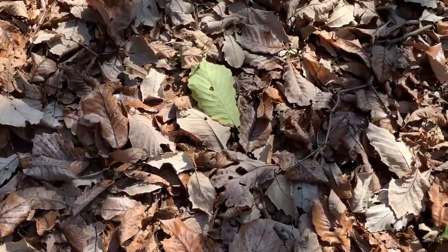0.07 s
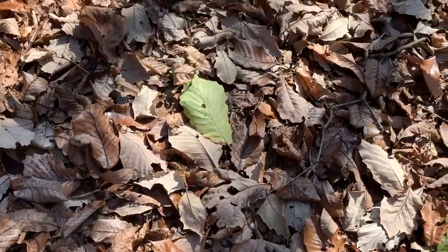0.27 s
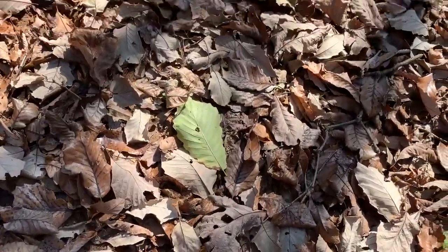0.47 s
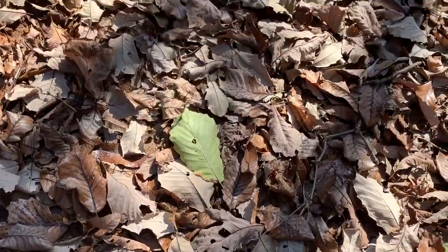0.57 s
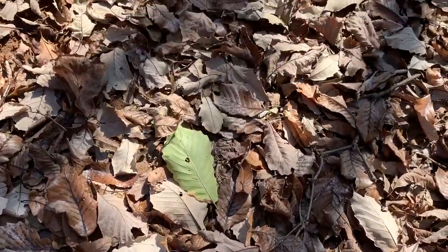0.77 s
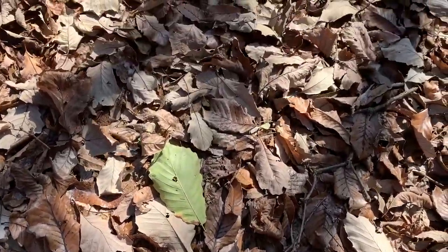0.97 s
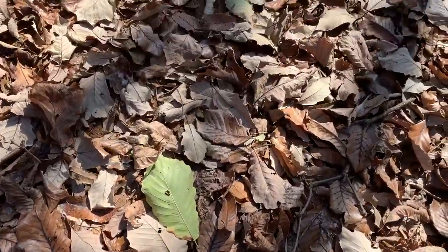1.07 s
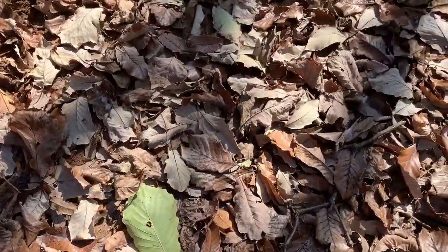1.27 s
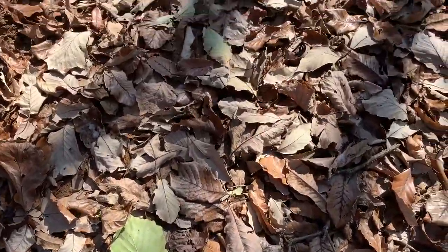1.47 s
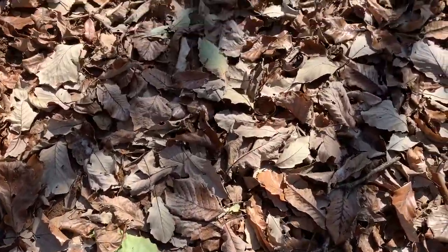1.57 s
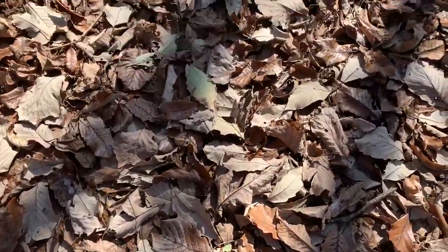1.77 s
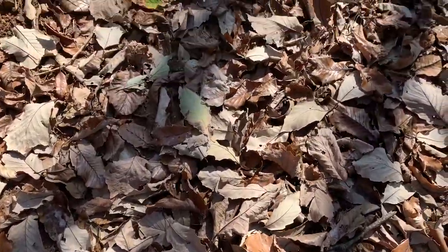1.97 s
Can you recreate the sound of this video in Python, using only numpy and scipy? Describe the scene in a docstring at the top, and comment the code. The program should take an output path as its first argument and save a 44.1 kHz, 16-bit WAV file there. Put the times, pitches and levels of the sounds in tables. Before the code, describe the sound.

Dry leaf litter crushed underfoot at walking pace, brittle rustling swells and single leaves snapping

```python
"""Footsteps in deep dry leaves

Woodland, about two seconds of footsteps and dragging through leaves, heard in stereo from a hand-held camera.
The feet crush and drag leaves: noise gated by random cracks, over a duller crunch of the packed bed.
Single leaves snap between as short resonant noise bursts; filtered noise gives faint air and a low rumble."""
import sys
import numpy as np
from scipy import signal
from scipy.fft import rfft, irfft
from scipy.io import wavfile

SR = 44100
rng = np.random.default_rng(int(sys.argv[2]) if len(sys.argv) > 2 else 0)


def waveform_to_disk(signal):
    """Save audio, clipped to [-1, 1], as 16-bit WAV at the path in sys.argv[1]."""
    frames = np.transpose(np.atleast_2d(signal))
    scaled = np.clip(frames, -1, 1) * 32767
    samples = np.round(scaled).astype(np.int16)
    wavfile.write(sys.argv[1], SR, samples)


N = 88420


def amp(db):
    """Turns dB into an amplitude factor."""
    return 10 ** (np.asarray(db) / 20)


def evened(x):
    """Scales a signal to an RMS of one."""
    return x / np.sqrt(np.mean(x ** 2) + 1e-20)


def colour(x, table):
    """Filters by a (Hz, dB) table: -60 dB below its first row, the last level held above its last."""
    hz = np.fft.rfftfreq(N, 1 / SR)
    f, db = np.transpose(table)
    gain_db = np.interp(np.log(hz + 1), np.log(f), db, left=-60)
    return irfft(rfft(x) * amp(gain_db), N)


# Spectrum shape of the low rumble. Each row: frequency in Hz, relative level in dB.
RUMBLE_SPECTRUM = [(12, -39), (20, -33), (54, 5), (119, -3), (147, -15), (400, -37), (880, -120)]
# How the rumble swells and sinks. Each row: time in seconds, level in dB.
RUMBLE_LEVEL = [(0.0, -60.5), (0.35, -65.5), (0.75, -70), (0.87, -59), (1.04, -67.5), (1.43, -58.5),
                (1.9, -64.5), (1.98, -53), (2.0, -62)]
AIR_DB = -62


def background():
    """Low rumble and faint woodland air, both steady noise filtered to shape; only the rumble varies in level."""
    s, db = np.transpose(RUMBLE_LEVEL)
    level = amp(np.interp(np.arange(N) / SR, s, db))
    rumble = level * evened(colour(rng.standard_normal((2, N)), RUMBLE_SPECTRUM))
    air_spectrum = [(150, -11.5), (1500, -25), (8000, -16), (16000, -25)]  # (Hz, relative dB)
    air = evened(colour(rng.standard_normal((2, N)), air_spectrum))
    return rumble + amp(AIR_DB) * air


# Single leaves snapping. Each row: start in seconds, tick level in dB, tick pitch in Hz,
# knock level in dB, knock pitch in Hz; the two gains below are added to the levels.
SNAPS = [(0.0372, -29, 3000.0, -24, 2330.0), (0.3019, -19, 9000, -24, 1700), (0.3321, -16, 5200, -25, 2000),
         (0.3368, -24, 6800, -40, 1500), (0.3573, -24, 6500, -33, 1720.0), (0.3633, -27, 6000, -24, 1680.0),
         (0.4053, -14, 6100.0, -30, 1420.0), (0.4099, -20, 6800.0, -35, 2150.0),
         (0.4712, -27, 4200.0, -23, 1700), (0.5495, -21, 6300, -38, 1800), (0.5512, -36, 2800, -21, 1500),
         (0.5526, -38, 2800, -17, 1000), (0.558, -40, 2800, -23, 1000), (0.5872, -36, 6500, -34, 1100),
         (0.6149, -30, 7100.0, -42, 1380.0), (0.627, -26, 7400.0, -40, 1680.0),
         (0.6405, -30, 8200.0, -44, 1810.0), (0.6579, -31, 7100.0, -39, 1640.0),
         (0.6923, -36, 3800, -38, 1900), (0.7158, -30, 6700, -51, 1550.0),
         (0.8552, -13, 6200.0, -23, 1810.0), (0.9093, -17, 6500, -24, 2200), (0.9122, -14, 6500, -15, 1300),
         (0.9274, -18, 11600.0, -28, 2450.0), (0.9818, -24, 7000, -41, 1770.0),
         (0.9952, -24, 8800.0, -32, 2150.0), (0.9986, -23, 8700.0, -33, 2330.0),
         (1.187, -36, 8300.0, -35, 1680.0), (1.2797, -24, 8100.0, -39, 1680.0),
         (1.3516, -14, 8500, -20, 1400), (1.3645, -12, 4300.0, -20, 1340.0), (1.4503, -20, 6000, -15, 900),
         (1.4583, -13, 7800, -24, 1000), (1.4755, -18, 8200.0, -14, 2200),
         (1.5581, -35, 3800.0, -29, 1770.0), (1.6085, -23, 7000, -30, 1900),
         (1.6107, -19, 11300.0, -32, 1980.0), (1.6281, -33, 10200.0, -31, 1980.0),
         (1.6552, -22, 7500.0, -32, 1550.0), (1.8675, -23, 3500.0, -24, 1590.0),
         (1.9574, -19, 7000, -22, 1700), (1.98, -20, 6500, -20, 1400)]
TICK_GAIN_DB, KNOCK_GAIN_DB = -3, -4
TICK_S, KNOCK_S = 0.0012, 0.0011  # fade to 1/e
TICK_Q, KNOCK_Q = 5, 2.2
KNOCK_BLOW_DB = 17  # the first break, re its splinters before the resonance


def snaps():
    """Each snap: a bright tick and a duller knock, noise bursts with a broad resonance; a blow starts the knock."""
    length = 800  # samples
    out = np.zeros((2, N + length))
    t = np.arange(length) / SR
    for s, tick_db, tick_hz, knock_db, knock_hz in SNAPS:
        onset = np.minimum(t / 0.000077, 1)
        splinters = rng.standard_normal((2, length)) * onset

        highpass = signal.butter(2, 3000, "high", fs=SR)
        burst = signal.lfilter(*highpass, splinters * np.exp(-t / TICK_S))
        tick = burst + 2 * signal.lfilter(*signal.iirpeak(tick_hz, TICK_Q, SR), burst)

        blow = amp(KNOCK_BLOW_DB) * (t == 0)
        knock = splinters * np.exp(-t / KNOCK_S) + blow
        for _ in range(2):
            knock = signal.lfilter(*signal.iirpeak(knock_hz, KNOCK_Q, SR), knock)

        # levels are set on the loud opening samples
        tick *= amp(tick_db + TICK_GAIN_DB) / tick[:, :50].std()
        knock *= amp(knock_db + KNOCK_GAIN_DB) / knock[:, 10:70].std()
        start = round(s * SR)
        out[:, start:start + length] += tick + knock
    return out[:, :N]


def cracking(per_s, spread_db, crack_s):
    """Loudness contour of random cracks: sudden start, quick fade, a few large."""
    size = amp(spread_db * np.minimum(rng.exponential(1, N), 3.5))
    size *= rng.random(N) < per_s / SR  # most samples start no crack
    fade = np.exp(-2 / (crack_s * SR))  # of power, per sample
    power = signal.lfilter([1], [1, -fade], size ** 2)
    return evened(np.sqrt(power + 1e-12))


# Brittle leaf cells bursting: total rate, cycles to fade to 1/e, spread of sizes
POP_PER_S, POP_CYCLES, POP_SPREAD_DB = 700, 3.74, 2.5


def pops(sizes_hz, count=16):
    """Separate brittle bursts, each ringing a few cycles at its own pitch, alike in both copies but for sign."""
    out = np.zeros((2, N))
    t = np.arange(1024) / SR
    for hz in np.geomspace(sizes_hz[0], sizes_hz[-1], count):
        size = amp(POP_SPREAD_DB * np.minimum(rng.exponential(1, N), 4))
        size *= rng.random(N) < POP_PER_S / count / SR
        sign = rng.choice([-1., 1.], (2, N))
        ring = np.sin(2 * np.pi * hz * t) * np.exp(-t * hz / POP_CYCLES) * np.sqrt(hz)
        out += signal.oaconvolve(size * sign, ring[None])[:, :N]
    return evened(out)


POP_DB = -5  # pops re the rustle, before the shared contour scales them


def fractures(shared, sizes_hz, per_s, spread_db, crack_s, own):
    """Leaves of each size crack at their own moments and sound around their own pitch."""
    hz = np.fft.rfftfreq(N, 1 / SR)
    rustle = np.zeros((2, N))
    for one_size in np.eye(len(sizes_hz)):
        contour = shared + own * cracking(per_s, spread_db, crack_s)
        noise = contour * rng.standard_normal((2, N))
        band = np.sqrt(np.interp(hz, sizes_hz, one_size))  # neighbouring sizes cross-fade in power
        rustle += irfft(rfft(noise) * band, N)
    return evened(rustle) + amp(POP_DB) * shared * pops(sizes_hz)


# Levels of the steps and drags, in successive groups. Each row: time in seconds, crackle level in dB,
# bed crunch in dB re crackle, low crush in dB re crackle.
STEPS_AND_DRAGS = [
    [(0, -30.5, -6.5, -10.5), (0.03, -38, -1.5, -3.5), (0.06, -38.5, -6.5, -6.5), (0.1, -39, -2.5, -8),
     (0.131, -43.5, -3, -7), (0.136, -34, -3.5, -6), (0.17, -29.5, -5, -10), (0.22, -29.0, -3, -13),
     (0.27, -22.5, -3.5, -14.5), (0.3, -24.5, -7, -17), (0.33, -35.5, -1.5, -12), (0.341, -40, -6, -14)],
    [(0.38, -39, -2.5, -12.5), (0.4, -35, -8.5, -15), (0.42, -36.5, -4, -13.5), (0.46, -30, -2, -14.5),
     (0.49, -35.5, -0.5, -12.5), (0.545, -31.5, -6.5, -16), (0.562, -39, -3, -15), (0.58, -41.5, -8, -7),
     (0.63, -45, -9, -20), (0.65, -42, -5.5, -18), (0.675, -42, -2, -19), (0.7, -54, -4, -13),
     (0.767, -49, -6, -20)],
    [(0.771, -34, -6.5, -14), (0.8, -24.5, -7, -15), (0.88, -24, -9, -13), (0.915, -25, -6.5, -8),
     (0.955, -33.5, -10.5, -19.5), (0.975, -41, -5.5, -10), (1.01, -36.5, -8.5, -15), (1.1, -37, 1, -13.5),
     (1.15, -39.5, -5.5, -15.5), (1.2, -47, -4, -8), (1.25, -51.5, -1.5, -16), (1.277, -57, -3, -3)],
    [(1.281, -33.5, -11.5, -14.5), (1.31, -32.5, 1.5, -6.5), (1.355, -23, -4, -7), (1.39, -25.5, -3.5, -5),
     (1.45, -20, -6.5, -14), (1.5, -25.0, -6, -11), (1.52, -33.5, -2.5, -13), (1.55, -40.5, -8, -4.5),
     (1.595, -42.5, -0.5, -7.5), (1.652, -39.5, -6, -7)],
    [(1.656, -32.5, -4, -15.5), (1.72, -32.0, -8.5, -10.5), (1.8, -32, -10, -13.5), (1.85, -35, -7, -8.5),
     (1.9, -32, -5, -8.5), (1.915, -26.5, -13.5, -9.5), (1.94, -23, -4.5, -5.5), (1.97, -21.5, -6.5, -12),
     (2.0, -24, -6, -7.5)],
]
# Spectrum shapes of crisp crackle, packed bed and low crush. Each row: frequency in Hz, relative level in dB.
CRACKLE_SPECTRUM = [(1500, -10), (2800, -3.5), (4000, -2), (5500, -2.5), (7000, -1), (8500, -2),
                    (10500, -3), (13000, -7.5), (16000, -8.5)]
BED_SPECTRUM = [(700, -20), (1100, -4.5), (1600, 1.5), (2200, -1), (2800, -8.5), (4500, -41)]
CRUSH_SPECTRUM = [(100, -22), (200, -13), (400, -13), (800, -1.5), (1100, 0), (2000, -25)]
# Pitches of the leaf sizes in each layer. Each entry: frequency in Hz.
CRISP_SIZES_HZ = [3500, 5500, 8000, 11000, 14500]
BED_SIZES_HZ = [1100, 1500, 2000, 2800]
CRUSH_SIZES_HZ = [300, 600, 1000]


def leaves():
    """Cracks gate noise under the feet: some shake leaves of all sizes, others only one size."""
    s, crackle_db, bed_db, crush_db = np.vstack(STEPS_AND_DRAGS).T
    t = np.arange(N) / SR
    shared = 0.19 * cracking(600, 1.85, 0.0015)
    shared *= evened(cracking(100, 4.2, 0.0016) + 1.2)  # sparser cracks swell the dense ones
    shared += 0.42

    crisp = fractures(shared, CRISP_SIZES_HZ, per_s=380, spread_db=6.3, crack_s=0.0099, own=1.0)
    bed = fractures(shared, BED_SIZES_HZ, per_s=280, spread_db=2.2, crack_s=0.0096, own=1.0)
    crush = fractures(shared, CRUSH_SIZES_HZ, per_s=140, spread_db=3.0, crack_s=0.0044, own=0.69)
    layers = ((crisp, CRACKLE_SPECTRUM, crackle_db),
              (bed, BED_SPECTRUM, crackle_db + bed_db),
              (crush, CRUSH_SPECTRUM, crackle_db + crush_db))

    out = np.zeros((2, N))
    for x, spectrum, db in layers:
        out += amp(np.interp(t, s, db)) * evened(colour(x, spectrum))
    return out


# Stereo spread. Each row: frequency in Hz, phase lead of the right channel in radians,
# share of separate noise in the right channel from 0 to 1.
STEREO_SPREAD = [(0, 0.5, 0.23), (1000, 0.5, 0.24), (2160, 1.08, 0.19), (2980, -2.5, 0.94), (4600, -3.5, 1),
                 (6300, -5.5, 0.77), (7420, -5, 0.53), (8650, -3, 0), (9200, -2.5, 0.4),
                 (10420, -0.5, 0.94), (11930, 0.6, 0.4), (13130, 4, 0.2), (14100, 3, .04), (15000, 1, .03)]
# Stereo balance. Each row: frequency in Hz, left minus right in dB.
LEFT_LOUDER = [(2500, -0.55), (5500, -4), (8000, -0.5)]


def scene():
    """Stereo spread: phase lead and share of separate noise in the right channel, by frequency."""
    first, second = rfft(leaves() + snaps() + background())
    hz = np.fft.rfftfreq(N, 1 / SR)
    f, lead, share = np.transpose(STEREO_SPREAD)
    share = np.clip(np.interp(hz, f, share), 0, 1)
    turn = np.exp(1j * np.interp(hz, f, lead))
    right = (np.sqrt(1 - share ** 2) * first + share * second) * turn
    tilt = amp(np.interp(hz, *np.transpose(LEFT_LOUDER)) / 2)  # half the difference to each channel
    return irfft(np.array([first * tilt, right / tilt]), N)


EDGE_HZ = 15760


def record(dry):
    """Upper edge of the sound: a steep low-pass without delay."""
    lowpass = signal.firwin(511, EDGE_HZ, window=("kaiser", 9), fs=SR)
    return signal.oaconvolve(dry, lowpass[None], "same")


dry = scene()
out = record(dry)
waveform_to_disk(out)
```